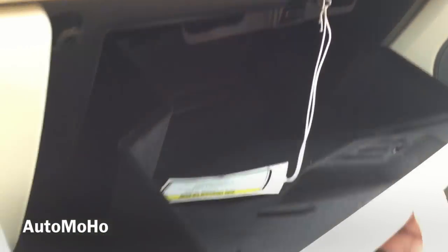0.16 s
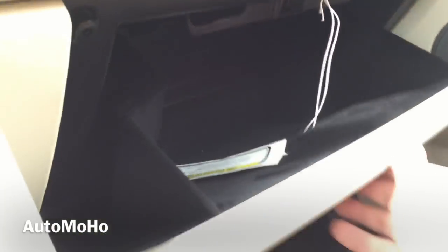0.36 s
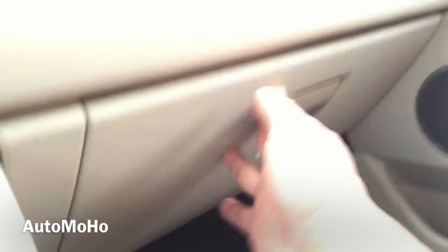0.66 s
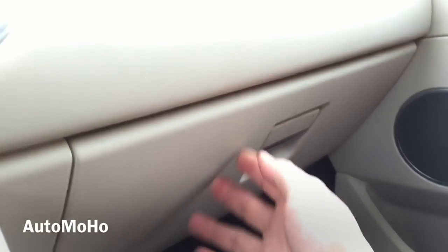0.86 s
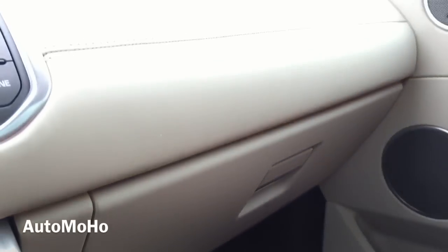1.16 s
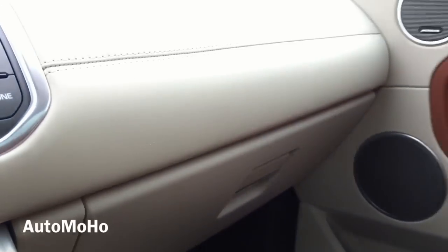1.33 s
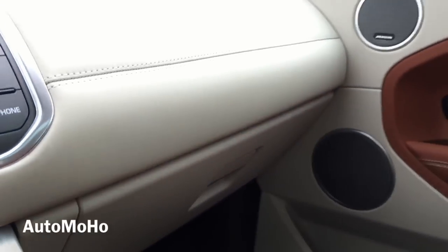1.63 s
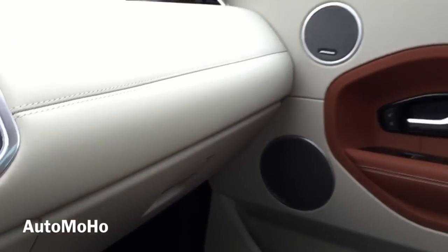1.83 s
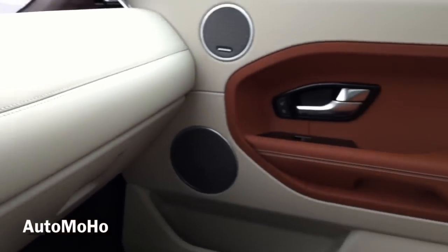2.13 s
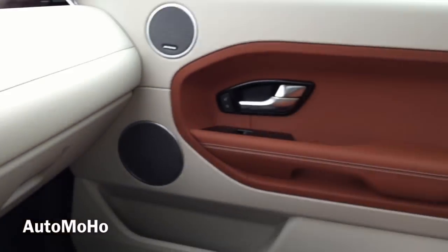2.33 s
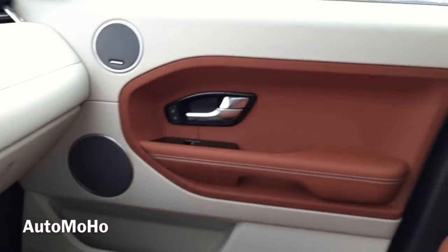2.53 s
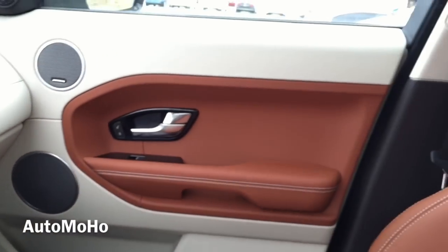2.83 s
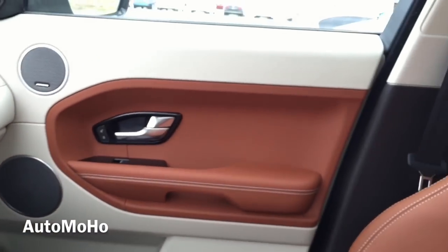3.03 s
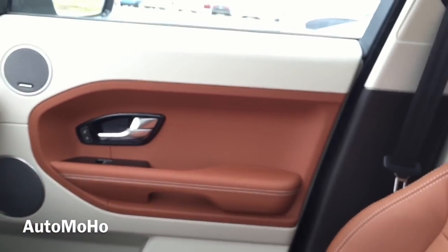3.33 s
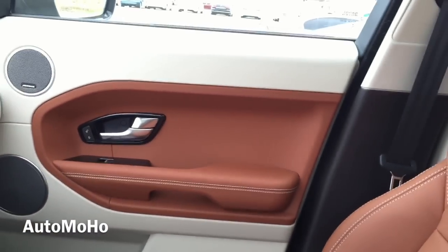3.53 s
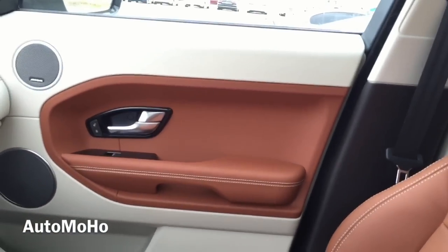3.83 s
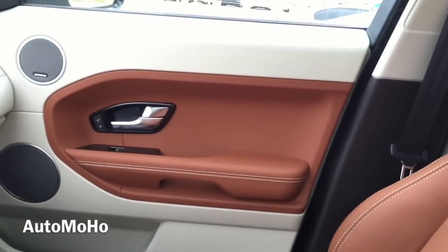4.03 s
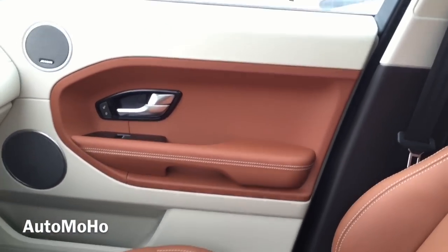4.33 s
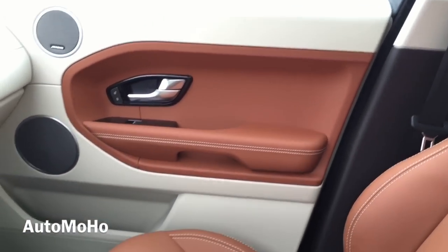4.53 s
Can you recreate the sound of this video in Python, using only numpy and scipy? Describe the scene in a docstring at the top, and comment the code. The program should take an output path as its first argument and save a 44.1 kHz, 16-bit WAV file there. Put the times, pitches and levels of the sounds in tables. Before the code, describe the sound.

Inside a car, an idling engine makes a quiet, low hum throughout. A sleeve swishes softly, then the glove box lid shuts with a sharp plastic clack and a short, low thump, by far the loudest sound. The sleeve hisses again as the arm draws back, fading to faint clothing rustle and tiny ticks. The microphone is close, and the padded cabin has almost no echo.

```python
"""An idling engine hums through a car cabin, and clothes rustle close to a small microphone.
A sleeve hisses as an arm swings the glove box lid up. The bolts clack on their strikers and snap
home about 15 ms later, ringing the plastic; the lid thumps its rubber stops and the box booms.
The sleeve draws back and settles, with faint ticks and thin whistles over the hum."""
import sys
import numpy as np
from scipy import signal
from scipy.fft import rfft, irfft
from scipy.io import wavfile
from scipy.ndimage import uniform_filter1d

SR = 44100
rng = np.random.default_rng(int(sys.argv[2]) if len(sys.argv) > 2 else 0)


def int16_out(signal):
    """Quantize to a 16-bit WAV file."""
    q = np.round(np.clip(np.atleast_2d(signal).T, -1, 1) * 32767)
    wavfile.write(sys.argv[1], SR, q.astype(np.int16))


N = 206091
TIME, HZ = np.arange(N) / SR, np.fft.rfftfreq(N, 1 / SR)
RING_TIME = TIME[:SR // 2]


def gain_of(db):
    """Decibels to an amplitude factor."""
    return 10 ** (np.asarray(db) / 20)


def unit_rms(x):
    """Scales a sound to rms 1."""
    return x / np.sqrt(np.mean(x ** 2) + 1e-20)


def curve(points, hz):
    """Joins breakpoints along a log-frequency axis."""
    point_hz, value = np.transpose(points)
    return np.interp(np.log(hz + 1), np.log(point_hz), value)


def hump(hz, octaves):
    """A smooth band-pass EQ in dB around a centre frequency."""
    return -10 * np.log10(1 + (np.log2((HZ + 1) / hz) / octaves) ** 4)


def resonant(colour, peaks):
    """A broad EQ in dB with resonance peaks standing on it."""
    boost_db = sum(db / (1 + (2 * (HZ - hz) / width_hz) ** 2) for hz, width_hz, db in peaks)
    return curve(colour, HZ) + boost_db


def add(mix, start_s, sound):
    """Drops a sound into the mix."""
    part = mix[max(round(start_s * SR), 0):][:len(sound)]
    part += sound[:len(part)]


def noise(colour_db):
    """Noise of rms 1 with the given spectrum."""
    return unit_rms(irfft(rfft(rng.standard_normal(N)) * gain_of(colour_db), N))


def wander(rate_hz):
    """Random modulation of rms 1, rolling off above rate_hz."""
    return noise(-10 * np.log10(1 + (HZ / rate_hz) ** 4))


def tone(hz, unsteady, rate_hz=4):
    """A tone of rms 1 whose strength and phase wander."""
    swing = 1 + unsteady * (wander(rate_hz) + 1j * wander(rate_hz))
    return unit_rms((swing * np.exp(2j * np.pi * (hz * TIME + rng.random()))).real)


def coloured(x, colour_db):
    """Minimum-phase EQ: nothing rings ahead of the hit."""
    log_gain = np.log(gain_of(np.r_[colour_db, colour_db[:0:-1]]))
    response = np.exp(np.conj(signal.hilbert(log_gain)))[:len(HZ)]
    return irfft(rfft(x, N) * response, N)[:len(x)]


def whitened(x):
    """Flattens a burst's spectrum so that it drives all resonances alike."""
    power = uniform_filter1d(abs(rfft(x, N)) ** 2, size=800)
    return coloured(x, -10 * np.log10(power / power.mean() + 1e-6))


# engine tones: pitch_hz, level_db, unsteadiness (0-1)
ENGINE_TONES = [(54.8, -41, 0.01), (86.2, -54, 0.9), (177, -59, 0.4), (213.5, -59.5, 0), (394.2, -61, 1),
                (428, -69, 0.4)]
# fader ride of the cabin drone: time_s, level_db
DRONE_RIDE = [(0.1, -50), (0.95, -47), (1.3, -43.5), (1.53, -50), (1.7, -47), (1.91, -42), (2.06, -53),
              (2.28, -45), (2.57, -56), (2.73, -42.5), (3.11, -40.5), (3.27, -51.5), (3.43, -41),
              (3.8, -42), (3.92, -53), (4.07, -43), (4.4, -44.5), (4.62, -51.5)]
# EQ of the cabin's rumble and air: frequency_hz, gain_db
RUMBLE_EQ = [(15, -24.5), (28, -14.5), (45, 5), (110, 0), (200, -4.5), (310, -12), (400, -14.5), (560, -13),
             (760, -24), (1150, -24.5), (1600, -32), (3400, -36.5), (5500, -42.5), (15000, -47)]


def engine_idle(drone_hz=125.6, rumble_db=-44):
    """The engine hums and unevenly feeds a cabin resonance, over a bed of soft rumble."""
    hum = sum(gain_of(db) * tone(hz, unsteady) for hz, db, unsteady in ENGINE_TONES)
    drone_db = np.interp(TIME, *np.transpose(DRONE_RIDE))
    drone = gain_of(drone_db) * tone(drone_hz, unsteady=0.36, rate_hz=6.1)
    rumble = gain_of(rumble_db - 0.23 * wander(5.5)) * noise(curve(RUMBLE_EQ, HZ))
    return hum + drone + rumble


# light brushes of cloth: start_s, end_s, level_db, centre_hz, spread_octaves
CLOTH_BRUSHES = [(-0.05, 0.294, -64, 1840, 0.65), (0.035, 0.557, -53.5, 315, 0.52),
                 (0.23, 0.56, -59, 1430, .35), (0.767, 1.036, -64, 2380, 1.1),
                 (0.847, 0.925, -56.5, 11500, 0.73), (1.315, 1.5, -53.5, 1950, 0.4),
                 (1.32, 1.46, -58, 12500, 0.65), (1.45, 2.06, -70, 11000, 0.63),
                 (1.845, 1.937, -62.5, 8240, 0.6), (2.555, 2.635, -62.5, 1500, 1.0),
                 (3.02, 3.18, -66.5, 8480, .95)]


def cloth_brushes(grain_db=2.5, fade_share=0.22):
    """Clothes shift as the body turns, in soft swells of grainy noise."""
    out = np.zeros(N)
    for start, end, db, hz, octaves in CLOTH_BRUSHES:
        contact = np.clip(np.minimum(TIME - start, end - TIME) / (fade_share * (end - start)), 0, 1)
        out += gain_of(db) * contact * noise(hump(hz, octaves))
    return out * gain_of(grain_db * wander(80))


def cloth_folds(rustle, depth_db=2.3):
    """Folds catch and let go: small patches of the rustle's spectrum swell and sink."""
    frames = dict(nperseg=1024, noverlap=768)
    bands = signal.stft(rustle, SR, **frames)[2]
    patches = uniform_filter1d(rng.standard_normal(bands.shape), size=5, axis=0)
    patches = unit_rms(uniform_filter1d(patches, size=9, axis=1))
    return signal.istft(bands * gain_of(depth_db * patches), SR, **frames)[1][:N]


# the clearer handling ticks: start_s, peak_db, centre_hz, decay_s
CLEAR_TICKS = [(0.182, -50, 2460, .005), (0.215, -46.5, 1970, .004), (0.988, -34.5, 1850, .006),
               (1.787, -49, 2930, .007), (2.131, -49.5, 2150, 0.0056), (2.239, -54, 3500, .004),
               (2.838, -49.5, 1897, .003), (2.980, -51.5, 1880, 0.0063), (3.599, -53, 4500, .004),
               (3.725, -54.5, 3510, 0.0087), (4.005, -55, 4500, .003), (4.579, -53, 2800, .004)]
# the faint tick scattered among them: peak_db, centre_hz, decay_s
SCATTERED_TICK = (-61, 3600, 0.0031)


def hand_ticks(faint_per_s=5, attack_s=0.0018):
    """Tiny creaks and taps of the hand, each a soft-edged pip of noise."""
    out, t = np.zeros(N), RING_TIME
    faint = [(start, *SCATTERED_TICK) for start in TIME[rng.random(N) < faint_per_s / SR]]
    for start, db, hz, decay_s in CLEAR_TICKS + faint:
        envelope = (1 - np.exp(-t / attack_s)) * np.exp(-t / decay_s)
        tick = envelope * noise(hump(hz, octaves=0.39))[:len(t)]
        add(out, start, gain_of(db) * tick / abs(tick).max())
    return out


# the arm lifts, then withdraws:
# start_s, end_s, end_level_db, attack_s, swell_db_per_s, end_fizz_db, brighten_db_per_s
ARM_STROKES = [(0.28, 0.735, -51.5, 0.17, 0.5, 1, 33), (0.91, 1.545, -50, 0.13, 5, -5, -4.5)]
# EQ of the sleeve on each stroke: frequency_hz, gain_db
LIFT_EQ = [(410, -30.5), (700, 1.5), (1690, -4), (2160, -8.5), (3270, -7.5), (4080, -9.5), (10400, -24.5),
           (14500, -18), (15500, -22)]
WITHDRAW_EQ = [(470, -34), (800, -5), (1130, -1), (1420, -6.5), (2410, 2.5), (2800, -1.5), (5470, -3),
               (13500, -16.5), (15500, -14.5)]
# resonances each stroke excites: centre_hz, width_hz, boost_db
LIFT_RESONANCES = [(1211, 120, 5), (1720, 290, 7), (2750, 57, 5), (3400, 140, 8.5), (5340, 73, 5.5)]
WITHDRAW_RESONANCES = [(1100, 28, 11.3), (1647, 94, 11), (2420, 110, 3.9), (3070, 36, 11), (5470, 97, 4.6)]
ARM_STOP_S = 0.03


def sleeve(stroke, colour_db, grain_db, crossover_hz=6500):
    """Sliding cloth: a rub that swells with arm speed, and a fizz of fibres that grows faster still."""
    start, end, db, attack_s, swell_db_per_s, fizz_db, brighten_db_per_s = stroke
    speed = np.clip(np.minimum((TIME - start) / attack_s, (end - TIME) / ARM_STOP_S), 0, 1)
    from_end = np.clip(TIME, start, end) - end
    highs = 1 / (1 + (crossover_hz / (HZ + 1)) ** 8)
    rub = speed * noise(colour_db + 10 * np.log10(1 - highs + 1e-9))
    fizz_gain = speed ** 2.2 * gain_of(fizz_db + brighten_db_per_s * from_end)
    fizz = fizz_gain * noise(colour_db + 10 * np.log10(highs + 1e-9))
    return (rub + fizz) * gain_of(db + swell_db_per_s * from_end + grain_db * wander(150))


# latch hits: start_s, relative_level_db, tilt_db_per_octave, snap_db, crack_s, reflections_db
LATCH_HITS = [(0.7021, -6, -0.82, -10.5, .0046, -9.5), (0.7165, -6.3, 0.3, 3.5, .0042, -5),
              (0.726, -18.5, -4.5, 0.5, .002, -4), (0.734, -18.5, -8, -5, .0012, -2)]
# EQ of struck plastic: frequency_hz, gain_db
PLASTIC_EQ = [(90, -21.5), (170, -7), (260, -3.5), (320, -5.5), (420, -5), (580, -8), (850, -6.5),
              (1350, -0.5), (2500, -7), (3300, 0.5), (3900, -8), (6150, -3.5), (7200, -9), (15500, -15)]
# ring of the lid and dashboard: centre_hz, width_hz, boost_db
LID_RESONANCES = [(365, 35, 8.5), (447, 38, 6), (715, 70, 5.5), (945, 45, 8), (995, 40, 7.5), (1126, 55, 7),
                  (1316, 36, 4.5), (1393, 47, 6), (1629, 40, 8.5), (1847, 45, 10.5), (2074, 45, 8.5),
                  (2165, 50, 4), (2280, 100, 7), (2670, 45, 5), (2955, 55, 9.5), (3180, 45, 7),
                  (3300, 40, 5.5), (3405, 45, 7), (3558, 55, 10.5), (4120, 90, 6), (4310, 130, 4.5),
                  (4500, 70, 7), (4970, 60, 5.5), (5947, 50, 6), (6170, 70, 7.5), (8100, 190, 7.5),
                  (8500, 70, 6), (10600, 110, 5)]


def latch(release_s=0.0014, damp_s=0.034, snap_hz=8000, reverb_db=-8):
    """Each hit is a few ms of chattering plastic ringing through the lid; the cabin answers."""
    out, t = np.zeros(N), RING_TIME
    snap_shelf = 1 / (1 + (snap_hz / (HZ + 1)) ** 8)
    tilt_octaves = np.log2(np.maximum(HZ, 800) / 3000)
    damping = np.exp(-(t / damp_s) ** 2)  # the stops choke the lid
    for start, db, tilt_db, snap_db, crack_s, reflections_db in LATCH_HITS:
        chatter = rng.choice([-1., 1.], len(t)) * np.exp(-np.maximum(t - crack_s, 0) / release_s)
        drive = whitened(chatter + gain_of(reflections_db) * cabin_reverb(chatter))
        bite_db = tilt_db * tilt_octaves + snap_db * snap_shelf
        clack = coloured(drive, resonant(PLASTIC_EQ, LID_RESONANCES) + bite_db) * damping
        tail = cabin_reverb(coloured(chatter, curve(PLASTIC_EQ, HZ) + bite_db))
        hit = unit_rms(clack) + gain_of(reverb_db) * unit_rms(tail)
        add(out, start, gain_of(db) * np.std(drive) * hit)
    return out


# reverb time of the padded cabin: frequency_hz, t60_s
CABIN_DECAY = [(150, 0.17), (500, .14), (1500, 0.093), (4000, .102), (14000, 0.083)]


def cabin_reverb(x):
    """Dense, short reflections, each band dying at its own speed."""
    taps = rng.choice([-1., 1.], len(RING_TIME)) * (rng.random(len(RING_TIME)) < 0.2)
    hz, t, bands = signal.stft(taps, SR, nperseg=128)
    decay = gain_of(-60 * t / curve(CABIN_DECAY, hz)[:, None])
    tail = signal.istft(bands * decay, SR, nperseg=128)[1]
    return signal.fftconvolve(x, tail / np.linalg.norm(tail))[:len(x)]


# low thumps of the closing lid, then one as the hand lets go: start_s, level_db, pitch_hz, t60_s
LOW_THUMPS = [(0.7245, -3, 95.4, 0.041), (0.7366, -15, 40.4, 0.11), (0.742, -24, 185, 0.19),
              (0.7587, -3, 104, 0.021), (0.7738, -20.5, 41, .36), (0.989, -28.5, 47, 0.48)]


def low_thumps(attack_s=0.0019):
    """The lid bumps its rubber stops and the box booms, and a last soft thump follows as the hand lets go: each
    pulls on the air as a dying low sine."""
    out, t = np.zeros(N), RING_TIME
    for start, db, hz, t60_s in LOW_THUMPS:
        envelope = (1 - np.exp(-t / attack_s)) * gain_of(-60 * t / t60_s)
        add(out, start, -gain_of(db) * envelope * np.sin(2 * np.pi * hz * t))
    return out


# whistles and squeaks: start_s, length_s, level_db, pitch_hz, glide_hz_per_s, arch_hz, waver_share
THIN_WHISTLES = [(1.513, .09, -63, 5430, -300, -68.5, .004), (1.65, 0.092, -61, 4290, -2200, 60.5, 0.0038),
                 (2.057, .072, -62, 4230, -300, 100, .007), (2.196, .16, -62.5, 1098, -52, -0.5, 0.024),
                 (2.577, .056, -59.5, 1170, -600, 20, .04)]


def whistles(fade_share=0.26, flutter_db=2):
    """Faint, nearly pure tones: each swells, bends along a downward glide, and fades."""
    out, wobble = np.zeros(N), wander(120)
    for start, length, db, hz, glide, arch, waver in THIN_WHISTLES:
        since = np.clip(TIME - start, 0, length)
        off_centre = since - length / 2
        contour_hz = hz + glide * off_centre - arch * (2 * off_centre / length) ** 2
        phase = 2 * np.pi * np.cumsum(contour_hz * (1 + waver * wobble)) / SR
        envelope = np.clip(np.minimum(since, length - since) / (fade_share * length), 0, 1)
        out += gain_of(db) * envelope * np.sqrt(2) * np.sin(phase)
    return out * gain_of(flutter_db * wander(50))


def sleeve_settling(start_db=-61, fall_db_per_s=6, end_s=2.67, fade_s=0.38):
    """The sleeve rustles on, ever more softly, after the arm stops."""
    since = TIME - (ARM_STROKES[-1][1] - ARM_STOP_S)
    contact = np.clip(np.minimum(since / ARM_STOP_S, (end_s - TIME) / fade_s), 0, 1)
    return contact * gain_of(start_db - fall_db_per_s * since) * noise(hump(hz=2245, octaves=1))


def scene():
    """The mono mix at the microphone: lid, cloth and small details over the engine bed."""
    lift = sleeve(ARM_STROKES[0], resonant(LIFT_EQ, LIFT_RESONANCES), grain_db=-1.2)
    withdraw = sleeve(ARM_STROKES[1], resonant(WITHDRAW_EQ, WITHDRAW_RESONANCES), grain_db=0)
    cloth = cloth_folds(lift + withdraw + sleeve_settling() + cloth_brushes())
    return (latch() + low_thumps() + cloth + whistles() + engine_idle() + hand_ticks())[None]


def record(dry, low_cut_hz=26.6, high_cut_hz=15360):
    """The small microphone drops the deepest bass, soft-clips at full scale and cuts the very top."""
    thinned = signal.sosfilt(signal.butter(2, low_cut_hz, "highpass", fs=SR, output="sos"), dry)
    clipped = thinned / (1 + thinned ** 8) ** (1 / 8)
    high_cut = signal.firwin(401, high_cut_hz, window=("kaiser", 9), fs=SR)
    return signal.oaconvolve(clipped, high_cut[None], "same")


dry = scene()
out = record(dry)
int16_out(out)
```